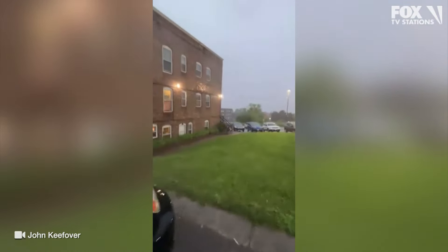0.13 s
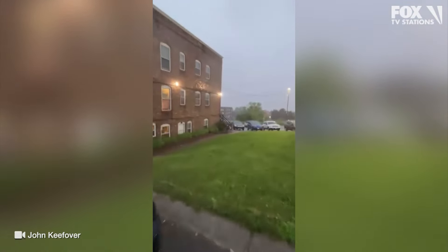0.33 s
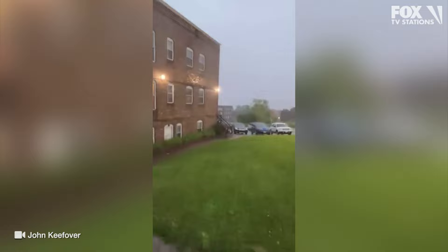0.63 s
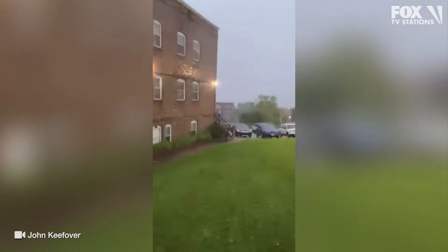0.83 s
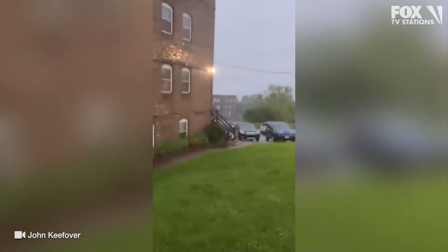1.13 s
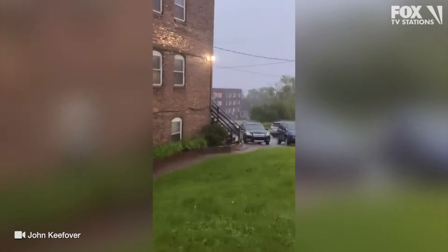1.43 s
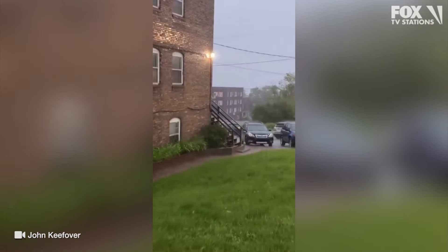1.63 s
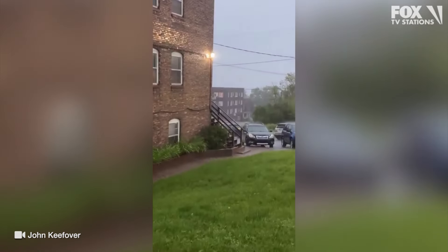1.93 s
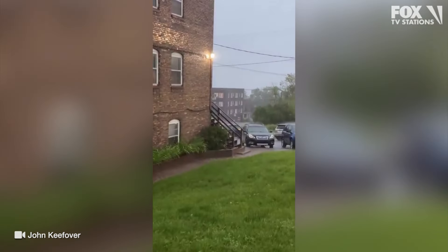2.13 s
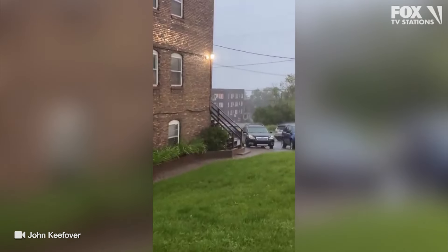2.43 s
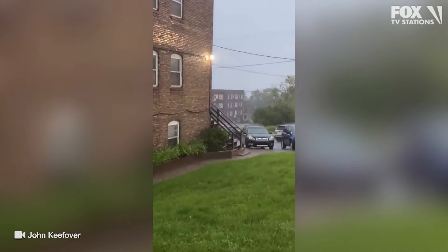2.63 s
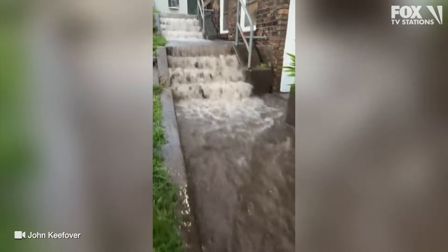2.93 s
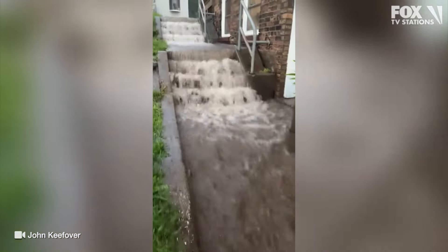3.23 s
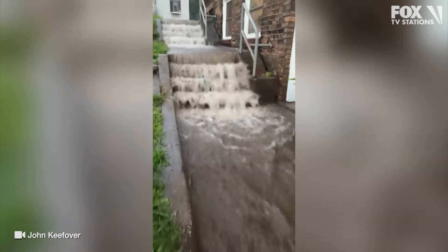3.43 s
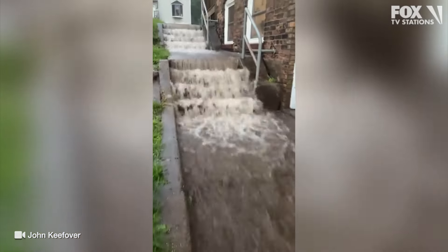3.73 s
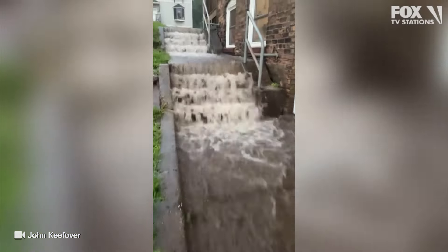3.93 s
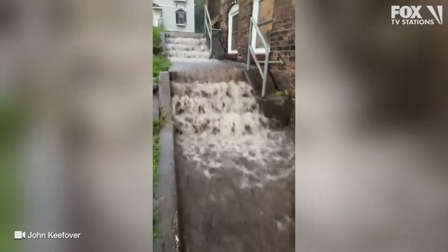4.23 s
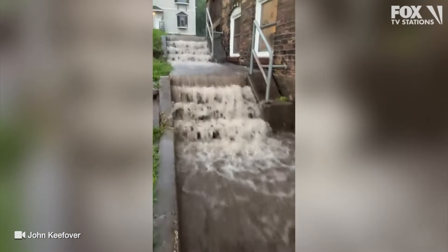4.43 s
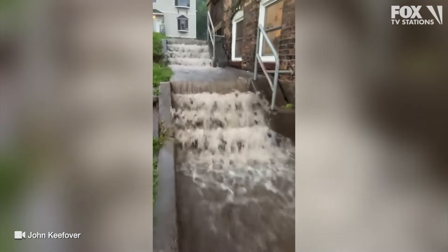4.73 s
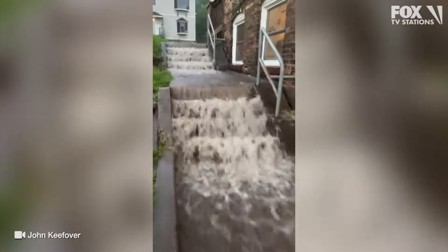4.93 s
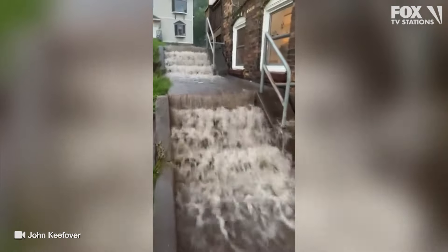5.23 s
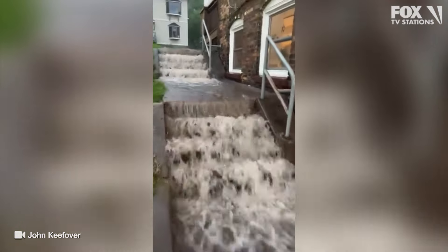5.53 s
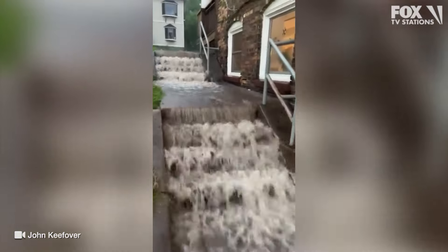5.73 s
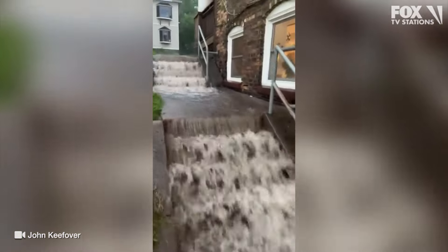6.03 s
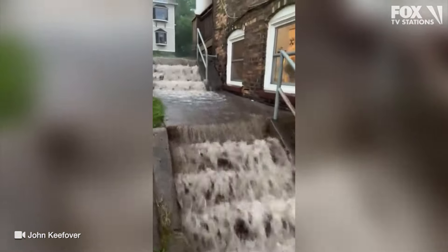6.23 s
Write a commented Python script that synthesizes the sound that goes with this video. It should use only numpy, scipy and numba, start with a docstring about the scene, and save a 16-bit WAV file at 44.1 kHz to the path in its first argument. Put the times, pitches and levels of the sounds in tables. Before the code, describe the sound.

Outdoors on a handheld phone, quiet rain hisses over grass while a car's faint tyre spray fades at once. Low bubbling wash and rumbling gusts come and go, with a few dull drop knocks close by. After a brief silence, much louder floodwater bursts in, a dense hissing, splashing cascade over a deep roar, growing as the phone walks nearer.

```python
"""Rain hisses over a lawn first, with a low bubbling wash that swells and ebbs, partly with rumbling gusts,
while the tyre spray of a leaving car fades.
After a short silence the phone faces floodwater tumbling down concrete steps and walks towards it.
All the water is hiss mixed with bursting bubbles; wind and the deep roar are coloured noise alone.
Near drops are short falling chirps; left and right differ by a phase that turns with pitch."""
import sys
import numpy as np
from scipy import signal
from scipy.fft import irfft
from scipy.io import wavfile
from scipy.ndimage import uniform_filter1d
from numba import njit

SR = 44100
rng = np.random.default_rng(int(sys.argv[2]) if len(sys.argv) > 2 else 0)


def master(y):
    """Save y as 16-bit WAV."""
    cut = np.clip(np.atleast_2d(y).T, -1, 1)
    pcm = np.round(cut * 32767)  # scale
    wavfile.write(sys.argv[1], SR, pcm.astype(np.int16))


N = 280917  # length in samples

# Stereo colour of each source: level, balance, likeness and phase by pitch. Columns of this group:
# pitch_hz, level_db (per Hz, relative), left_minus_right_db, likeness (0-1), left_lead_rad
STEPS_STEREO = [(250, -4.5, 4.6, 0.864, -0.51), (550, -0.8, -1.0, 0.922, -2.23),
                (720, -2.7, -6.5, 0.707, -2.36), (880, -5.6, -8.0, 0.423, 0.42),
                (1100, -4.4, -1.6, 0.96, 0), (1500, -5.0, -1.4, 0.99, 0), (2000, -5.8, -1.2, 0.98, 0.0),
                (2300, -7.2, -2.6, 0.72, 0.7), (2700, -9.3, -3.6, 0.7, 2.6), (3200, -9.6, -2.8, 0.7, 2.5),
                (3900, -12.4, -1.2, 0.5, 0.95), (4600, -10.2, -2.0, 0.56, 1.25),
                (5150, -9.8, -1.3, 0.62, 2.0), (5650, -11.8, 0, 1, 3.142), (6400, -13.2, 0, 1, 3.142),
                (6900, -14.0, 0, 0.75, 3.4), (7400, -14.4, 0, 0.45, 4.7), (7800, -15.6, 0, 0.7, 6.22),
                (8100, -15.8, 0, 0.5, 6.6), (8450, -15.0, 0, 0.8, 9.42), (8800, -16.6, 0, 0.5, 12.3),
                (9500, -17.2, 0, 0.35, 12.57), (12000, -17.0, 0, 0.5, 12.57),
                (15500, -22.2, 0.0, 0.3, 12.5)]
ROAR_STEREO = [(40, -5, -2, 0.65, 0.5), (64, 4.5, 5, 0.9, 0), (114, 8.5, -1.5, 0.98, 0),
               (160, 2, 2, 0.79, 0.46), (262, 1.5, 7, 0.98, 0.4), (350, -3.5, 4, 0.59, 1),
               (480, -73, -1, 0.99, -22)]
RAIN_STEREO = [(300, -4.5, -0.2, 0.884, -0.19), (600, -3.0, 0.7, 0.628, 0.08),
               (1000, -2.0, 2.2, 0.426, -0.27), (1500, -2.0, 0.2, 0.597, -0.3),
               (2000, -1.5, -0.1, 0.988, 0.02), (2700, -2.4, 0.1, 0.707, 2.32),
               (4100, -4.4, -0.3, 0.892, 0.18), (5100, -4.5, 0.8, 0.694, 1.89), (5550, -5.5, 0, 1, 3.142),
               (6400, -7.0, -0.0, 0.972, 3.16), (6900, -6.4, 0.8, 0.671, 3.66),
               (7400, -6.4, -0.2, 0.606, 4.59), (7800, -8.8, 0, 1, 6.283), (12000, -13.4, 0, 1, 6.283),
               (15500, -18.2, 0, 1, 6.283)]
WASH_STEREO = [(139, -4.5, 0.077, 0.85, 0.029), (312, 5, 0.084, 0.93, 0.15), (530, 2, 0.0054, 0.41, 0.9),
               (1110, 0, 0.92, 0.15, 0.72), (2580, -51, 0.087, 0.36, 0.05)]
SPRAY_STEREO = [(600, -12, 3, .5, 0.071), (1200, 22.5, 14, .6, 0.028), (2200, 5.5, 16, .7, 0.044),
                (4470, -19.5, 0, .7, .5), (8950, -45, -3.5, 0.46, 0)]
GUST_STEREO = [(31.4, 7, 0.0035, 0.99, 0.0088), (54, 10.5, 0.023, 1, 0.015), (115, 6, 0.0061, 1, 0.0085),
               (223, 0, 0, 1, 0.01), (380, -8.5, 0, 0.9, 0.01), (800, -72.5, 0.015, 0.59, 0.0048)]
# Brief swells of the white water; a row with 0 dB adds nothing: time_s (of the peak), length_s, extra_level_db
SWELLS = [(3.266, 0.029, 0), (3.45, 0.051, 0.5), (3.797, .04, 0), (4.617, 0.064, 2), (5.037, 0.18, 1.5),
          (5.36, 0.11, 1.5), (5.6, 0.17, 1.5), (5.92, 0.12, 0.5), (6.222, 0.029, 1.5)]
# Slow level of the deep roar, uneven by chance: time_s, level_db
ROAR_LEVEL = [(2.81, -28), (3.1, -31), (3.36, -32), (3.45, -28), (3.6, -30.5), (4.3, -29), (4.7, -30.5),
              (5.3, -31.5), (5.75, -30), (6.36, -31)]
# Near drops: start_s, level_db, top_hz, bottom_hz, low_weight (0-1),
# right_gain (relative to left; negative when the drop lands between the microphones)
DROPS = [(0.1658, -14, 3300, 2800, 0, -0.75), (0.7958, -16.5, 650, 130, .6, -1),
         (0.9440, -13.5, 1500, 130, 0.8, -0.9), (0.9746, -14.5, 1300, 110, 0.85, -0.8),
         (1.3512, -6.8, 950, 130, 0.1, 1.05), (1.6894, -23, 1700, 130, 0.15, 0.95),
         (2.5688, -14, 850, 200, 0.2, -0.85), (2.6104, -15, 950, 180, 0.2, -0.6),
         (3.5008, -12.5, 1100, 400, 0.1, -0.7), (4.7602, -11, 900, 200, 0.2, -0.7),
         (6.2330, -10, 4500, 250, .4, -0.8)]
# Low bubbling wash that swells and ebbs, partly with the gusts: time_s, level_db
WASH_LEVEL = [(0, -31.5), (.12, -31.5), (.17, -45.5), (.52, -49), (.58, -38), (.8, -36), (1.3, -33.5),
              (1.4, -50), (1.95, -61), (2.08, -42), (2.3, -40), (2.36, -35.5), (2.63, -34)]
# Gusts of wind: start_s, held_s, level_db
GUSTS = [(-.04, 0.099, -31.5), (.69, 0.2, -31.5), (.94, .08, -35), (1.05, 0.16, -30.5), (1.33, 0.028, -32),
         (1.56, 0.15, -39.5), (1.88, 0.16, -36.5), (2.08, 0.04, -38), (2.17, 0.06, -37.5),
         (2.32, 0.11, -31), (2.47, .16, -31.5)]

START_M, WALK_M_S = 8.38, 1.243  # distance to the falling water, walking speed
WHITE_DB, WHITE_TILT_DB_OCT = -10.5, -0.03  # white water at 1 m, tilt at the start
WHITE_BRIGHTENS_DB_OCT_S = -0.0446  # tilt change per second; negative, so the treble sinks slightly
RAIN_DB, RAIN_TILT_DB_OCT, RAIN_BRIGHTENS_DB_OCT_S = -34, -0.89, 0.15  # level, first tilt, tilt gained per s
DROP_LAG_CYCLES = 1.4  # each pitch arrives that many of its own cycles late
BODY_HZ, BODY_Q, BODY_GAIN = 570, 4, 0.7  # the phone's shell rings briefly under a drop
SPRAY_DB, SPRAY_FADE_DB_S = -43, 17.5  # level at the start, fade per second
GUST_RISE_S, GUST_FADE_DB_S, CALM_DB = 0.03, 140, -44
LAWN_ENDS_S, STEPS_START_S = 2.637, 2.8045
CUT_DB, CUT_S, TAIL_DB_S = -12.5, 0.005, 1247  # quick drop, then a fading tail
OPEN_S, SILENCE_DB = 0.0034, -70  # how fast the steps open, lowest gain in the gap
LOW_HZ, TOP_HZ = 45, 15700  # range the phone keeps
FRAME = 1024  # samples in one time slice
OVERLAP = 3 * FRAME // 4


def cascade():
    """White water falling step by step, louder on approach, over a deep roar of coloured noise."""
    def near_db(s):
        """Halving the distance adds 6 dB; brief swells add more."""
        distance_m = np.maximum(START_M - WALK_M_S * (s - STEPS_START_S), 1)
        return WHITE_DB - 20 * np.log10(distance_m) + swells_db(s)

    def tilt(s):
        """Balance of treble to bass as the walk goes on."""
        return WHITE_TILT_DB_OCT + WHITE_BRIGHTENS_DB_OCT_S * (s - STEPS_START_S)

    white = stereo(lambda: water(-5.5, 2.53, 3.8, count=30000), STEPS_STEREO, near_db, tilt,
                   surge_db=0.4, patch_db=1.2)
    roar = stereo(lambda: rng.standard_normal(N), ROAR_STEREO, lambda s: curve(ROAR_LEVEL, s)[0], flat,
                  surge_db=0.7, patch_db=0.63)
    return white + roar


def swells_db(s):
    """Extra level of the white water: each swell rises and sinks smoothly."""
    return sum(db * np.exp(-((s - at) / length) ** 2) for at, length, db in SWELLS)


def rain():
    """Dense fine drops on grass and street: short crackling grains in smooth hiss."""
    return stereo(lambda: water(-11, 1.0, 1.2, count=20000), RAIN_STEREO, lambda s: RAIN_DB + flat(s),
                  lambda s: RAIN_TILT_DB_OCT + RAIN_BRIGHTENS_DB_OCT_S * s, surge_db=-0.02, patch_db=1.62)


def drops():
    """Dull clicks whose lows lag their highs, so each is heard as a fast falling chirp."""
    length = 4096
    out = np.zeros((2, N + length))
    hz = np.maximum(np.fft.rfftfreq(length, 1 / SR), 1.)
    lag = np.exp(-2j * np.pi * DROP_LAG_CYCLES * np.log(np.maximum(hz, 40) / 8000))
    shell = 1 + BODY_GAIN / (1 + 1j * BODY_Q * (hz / BODY_HZ - BODY_HZ / hz))
    for start, db, top_hz, low_hz, lows, right in DROPS:
        top_cut = 1 + (hz / top_hz) ** 3.3
        low_cut = 1 + (low_hz / hz) ** 2.2
        chirp = irfft(lag * shell / hz ** lows / top_cut / low_cut)
        chirp = chirp / np.abs(chirp).max()
        at = int(start * SR)
        out[:, at:at + length] += undb(db) * np.outer([1, right], chirp)
    return out[:, :N]


def wash():
    """Low bubbling wash: hiss with longer-ringing bubbles, following its level table."""
    return stereo(lambda: water(-9.5, 0.82, 5.1, count=8000), WASH_STEREO, lambda s: curve(WASH_LEVEL, s)[0],
                  flat, surge_db=0.0, patch_db=1.0)


def spray():
    """Fizzing spray off the tyres, fading as the car drives away."""
    return stereo(lambda: water(-22.0, 1.5, 2.9, count=12000), SPRAY_STEREO,
                  lambda s: SPRAY_DB - SPRAY_FADE_DB_S * s, flat, surge_db=2.0, patch_db=2.0)


def gusts():
    """Low rumble of wind around the phone: coloured noise, nearly the same left and right."""
    return stereo(lambda: rng.standard_normal(N), GUST_STEREO, wind_db, flat, surge_db=1.86, patch_db=1.5)


def wind_db(s):
    """Each gust rises quickly out of the calm, holds and dies away; the strongest counts."""
    out = CALM_DB + flat(s)
    for start, held, db in GUSTS:
        rise = CALM_DB + (db - CALM_DB) * (s - start) / GUST_RISE_S
        fade = db - GUST_FADE_DB_S * (s - start - GUST_RISE_S - held)
        gust = np.minimum(np.minimum(rise, db), fade)
        out = np.maximum(out, gust)
    return out


def water(bubble_db, scatter_db, cycles, count):
    """Flat hiss with bubbles of every pitch from 150 to 9000 Hz bursting in it."""
    when, pitch, chance = rng.random((count, 3)).T
    hz = 150 * 60 ** pitch
    # many weak bubbles and a few strong ones; the factor hz gives equal energy per Hz
    size = hz * undb(-scatter_db * np.log(1 - .999 * chance))
    start = (when * N).astype(np.int64)
    bubbles = ring(start, hz, float(cycles), size, 0.1195, N, float(SR))
    return rng.standard_normal(N) + undb(bubble_db) * unit(bubbles)


@njit
def ring(start, hz, cycles, size, glide, n, sr):
    """Damped sines whose pitch rises as the bubble nears the surface."""
    out = np.zeros(n)
    for k in range(len(start)):
        length = cycles * sr / hz[k]  # samples until the ring has faded to 37 %
        phase = 0.
        for i in range(min(int(4 * length), n - start[k])):
            phase += 2 * np.pi * hz[k] * (1 + glide * i / length) / sr
            out[start[k] + i] += size[k] * np.exp(-i / length) * np.sin(phase)
    return out


def stereo(make, table, level_db, tilt, surge_db, patch_db):
    """Colours two unrelated streams and blends them, so left and right share a set part at each pitch."""
    hz, s, shared = signal.stft(make(), SR, nperseg=FRAME, noverlap=OVERLAP)
    apart = signal.stft(make(), SR, nperseg=FRAME, noverlap=OVERLAP)[2]
    hz = np.maximum(hz, 1.)[:, None]
    rows = np.transpose(table)
    rows[3] = np.arccos(np.clip(rows[3], 0, 1))  # likeness as a mixing angle
    db, pan_db, angle, lead = (np.interp(np.log(hz), np.log(rows[0]), c) for c in rows[1:])
    db = db - 24 * np.maximum(np.log2(rows[0, 0] / hz), 0)  # falls away under the lowest row
    colour = unit(undb(db))
    # surges move wide regions together, patches boil up here and there
    surges = surge_db * flicker(shared.shape, frames=7, bins=120)
    patches = patch_db * flicker(shared.shape, frames=4, bins=12)
    octaves = np.log2(np.maximum(hz, 500) / 2000)  # the tilt pivots at 2000 Hz and stops under 500
    gain = colour * undb(level_db(s) + tilt(s) * octaves + surges + patches)
    left = shared * undb(pan_db / 2)
    right = np.cos(angle) * np.exp(-1j * lead) * shared + np.sin(angle) * apart
    pair = gain * np.array([left, right * undb(-pan_db / 2)])
    return signal.istft(pair, SR, nperseg=FRAME, noverlap=OVERLAP)[1][:, :N]


def flicker(shape, frames, bins):
    """Random level over pitch and time, smoothed over so many bins and frames; rms 1."""
    field = rng.standard_normal(shape)
    for _ in range(2):
        field = uniform_filter1d(field, frames, axis=1)
        field = uniform_filter1d(field, bins, axis=0)
    return unit(field)


def undb(db):
    """dB to gain."""
    return 10 ** (np.asarray(db) / 20)


def curve(rows, s):
    """Columns of a table, joined by straight lines."""
    t, *columns = np.transpose(rows)
    return [np.interp(s, t, c) for c in columns]


def unit(x):
    """Scaled to rms 1."""
    return x / np.sqrt(np.mean(x ** 2))


def flat(s):
    """Zero at all times."""
    return 0 * s


def gap(s):
    """Gain around the silence: the lawn drops and tails off, the steps open almost at once."""
    after = np.maximum(s - LAWN_ENDS_S, 0)
    drop_db = CUT_DB * np.minimum(after / CUT_S, 1)
    tail_db = TAIL_DB_S * np.maximum(after - CUT_S, 0)
    closing = undb(np.maximum(drop_db - tail_db, SILENCE_DB))
    opening = np.clip((s - STEPS_START_S) / OPEN_S + 1, 0, 1)
    return np.maximum(closing, opening)


def scene():
    """The lawn, a near-silent gap, then the steps; near drops fall in both places."""
    s = np.arange(N) / SR
    at_steps = s > 2.74  # swapped inside the gap
    steps = cascade()
    lawn = rain() + spray() + wash() + gusts()
    return (np.where(at_steps, steps, lawn) + drops()) * gap(s)


def record(dry):
    """The phone cuts the deepest bass gently and the top steeply."""
    bass_cut = signal.butter(3, LOW_HZ, "high", fs=SR, output="sos")
    top_cut = signal.ellip(14, .2, 70, TOP_HZ, fs=SR, output="sos")
    return signal.sosfilt(top_cut, signal.sosfilt(bass_cut, dry))


dry = scene()
out = record(dry)
master(out)
```